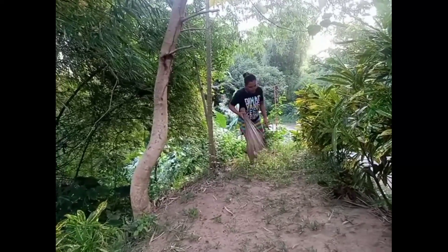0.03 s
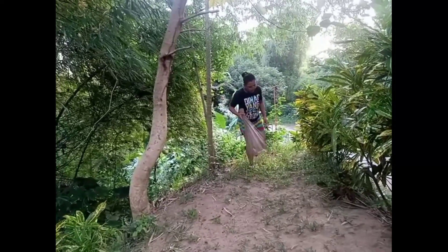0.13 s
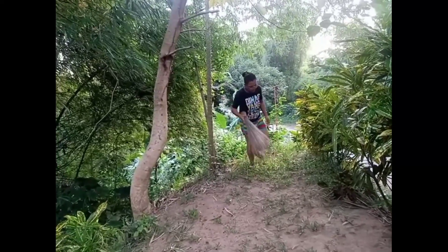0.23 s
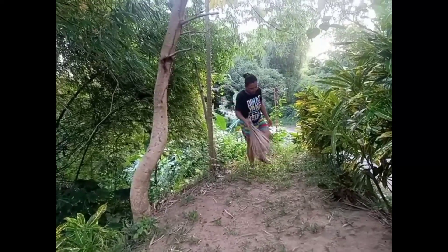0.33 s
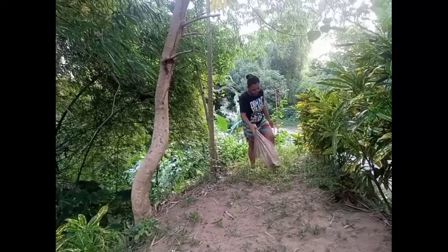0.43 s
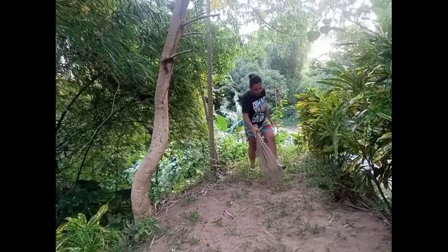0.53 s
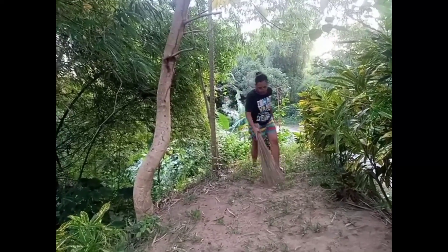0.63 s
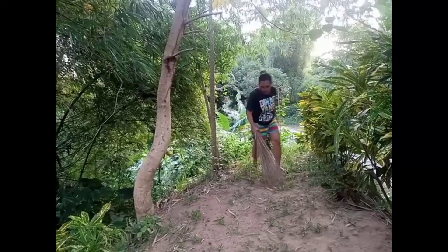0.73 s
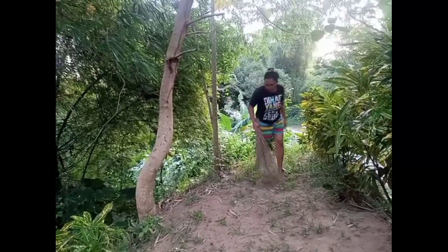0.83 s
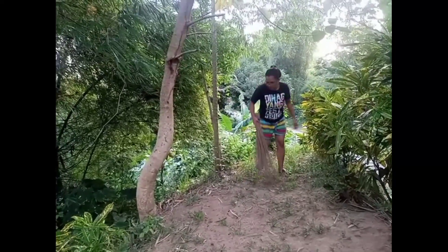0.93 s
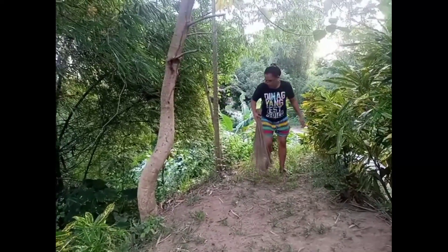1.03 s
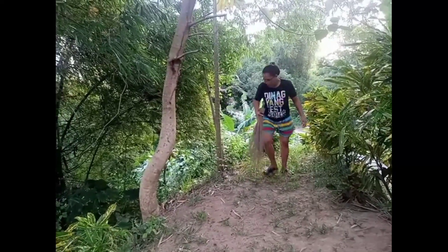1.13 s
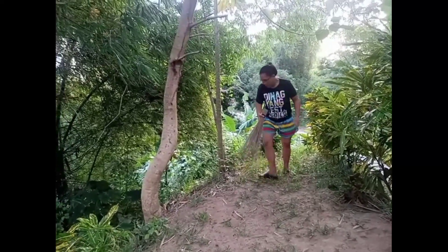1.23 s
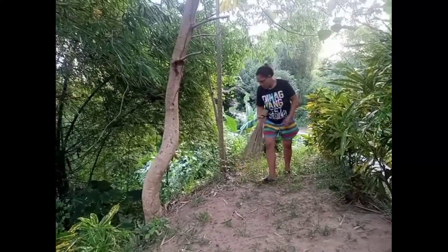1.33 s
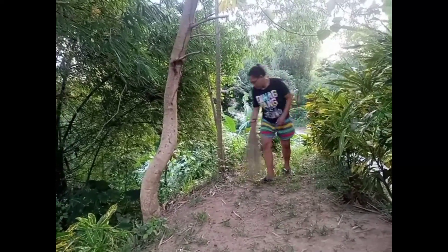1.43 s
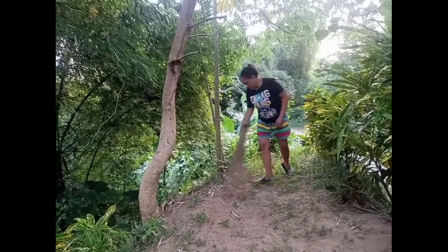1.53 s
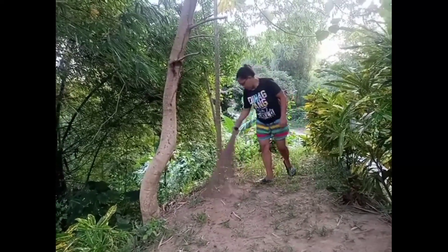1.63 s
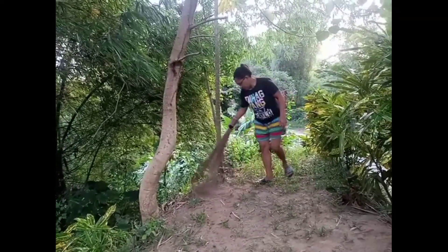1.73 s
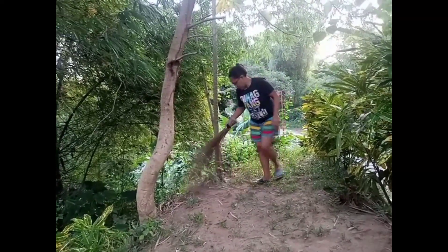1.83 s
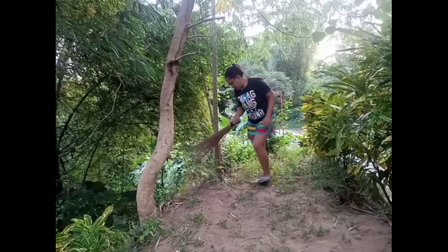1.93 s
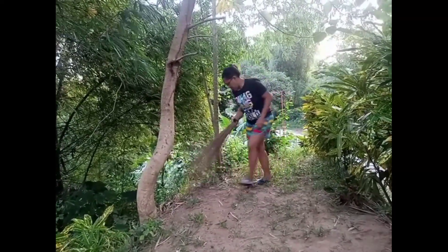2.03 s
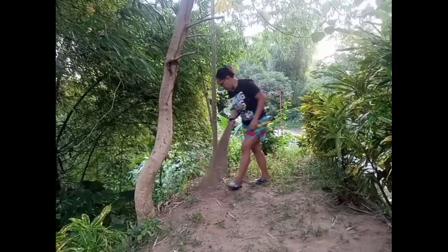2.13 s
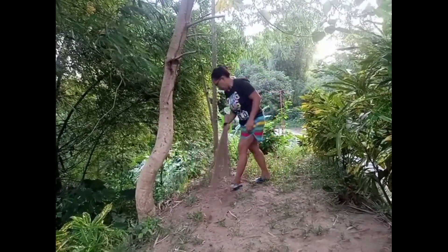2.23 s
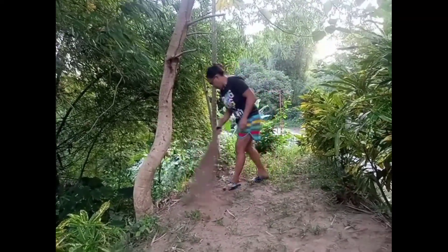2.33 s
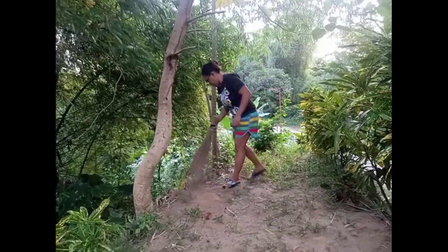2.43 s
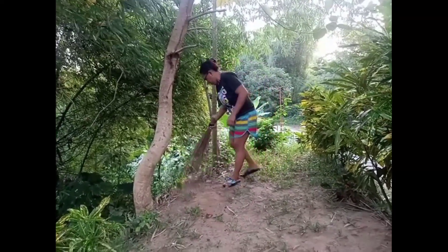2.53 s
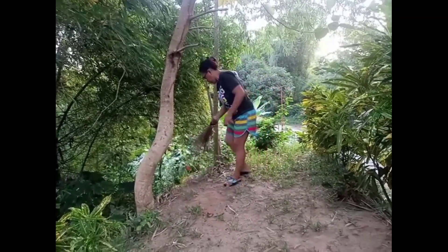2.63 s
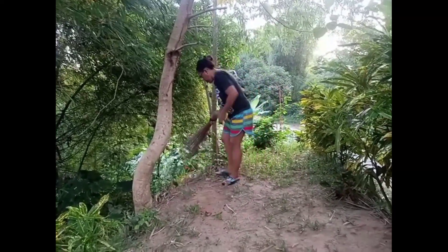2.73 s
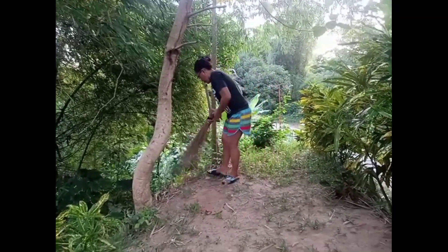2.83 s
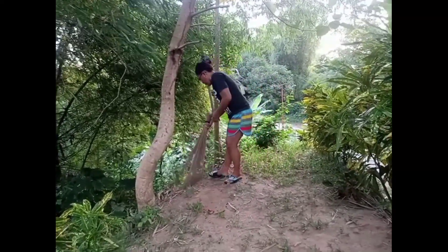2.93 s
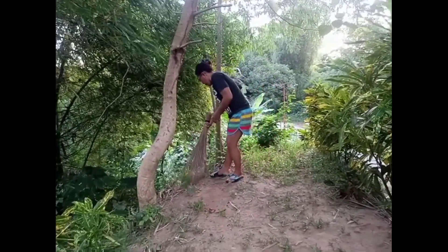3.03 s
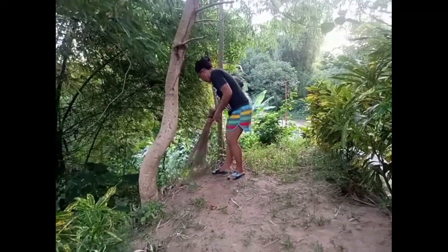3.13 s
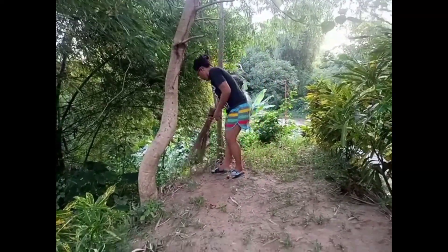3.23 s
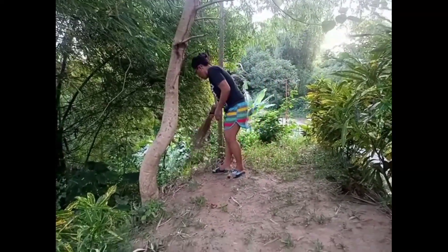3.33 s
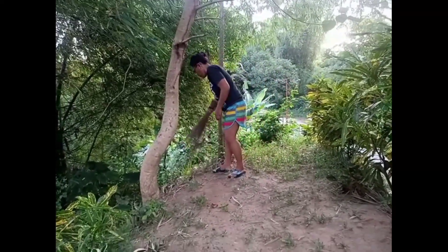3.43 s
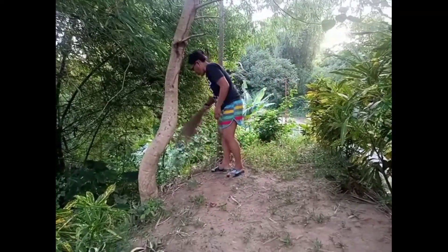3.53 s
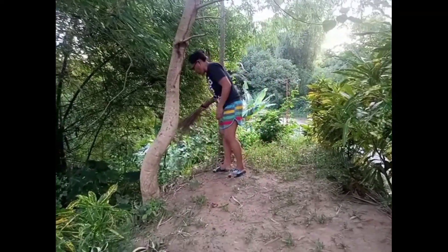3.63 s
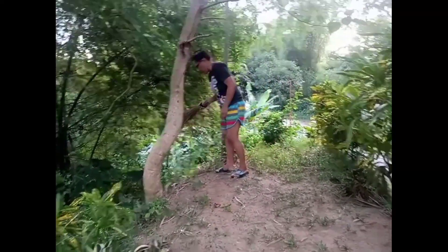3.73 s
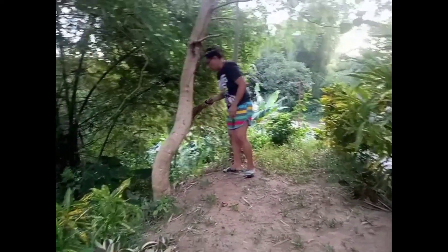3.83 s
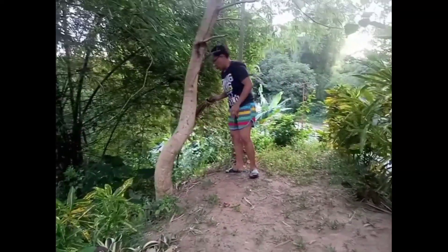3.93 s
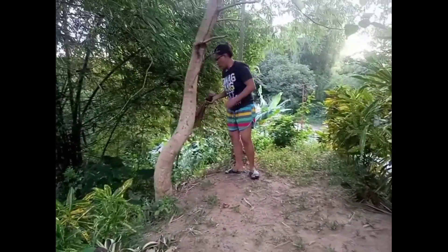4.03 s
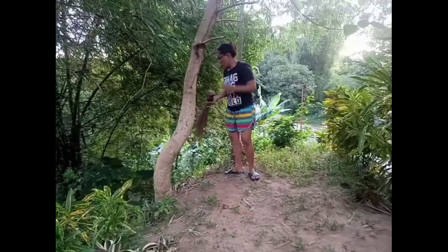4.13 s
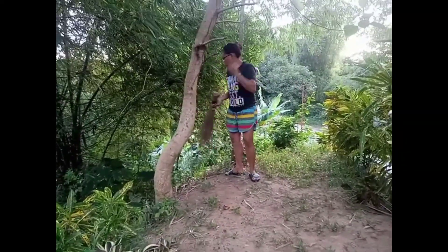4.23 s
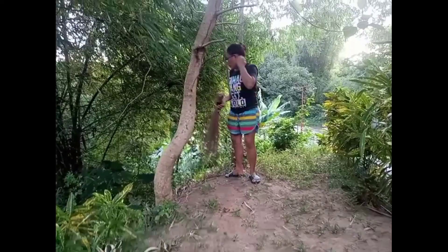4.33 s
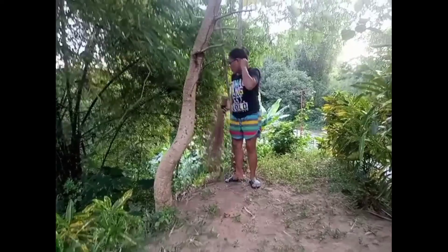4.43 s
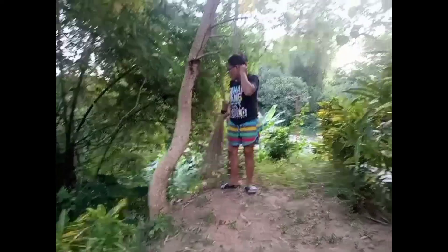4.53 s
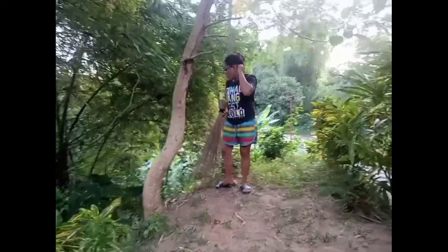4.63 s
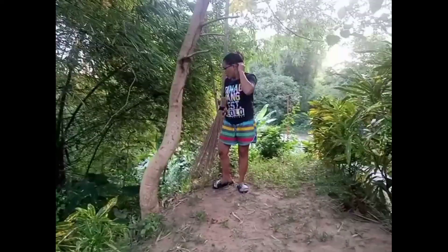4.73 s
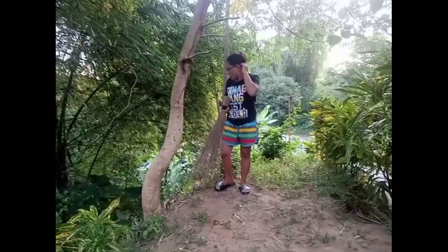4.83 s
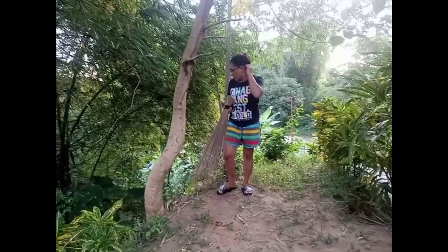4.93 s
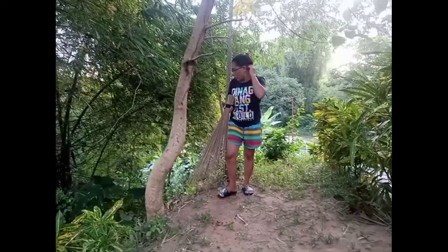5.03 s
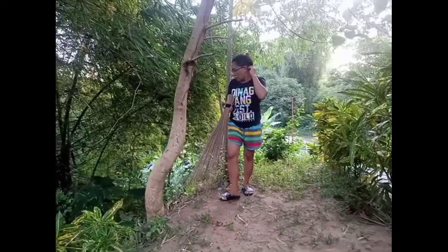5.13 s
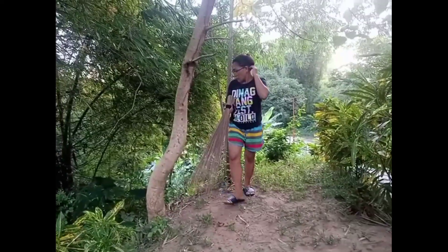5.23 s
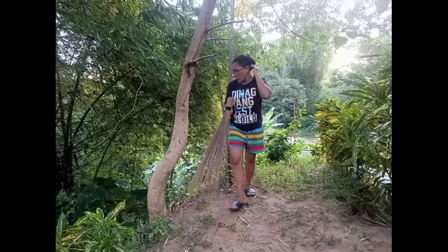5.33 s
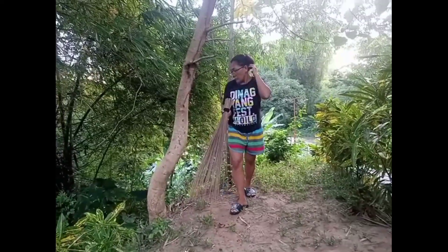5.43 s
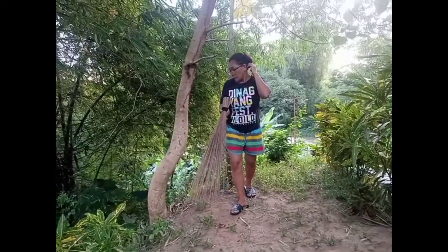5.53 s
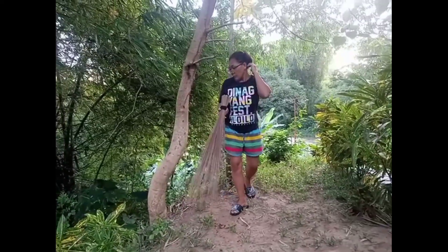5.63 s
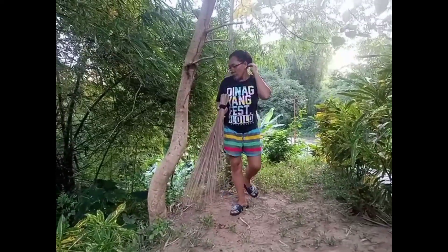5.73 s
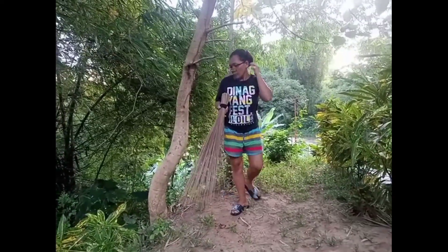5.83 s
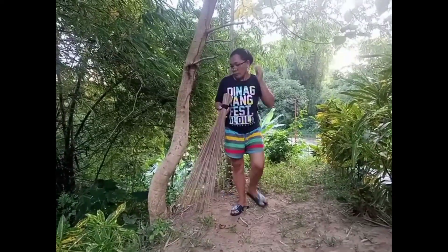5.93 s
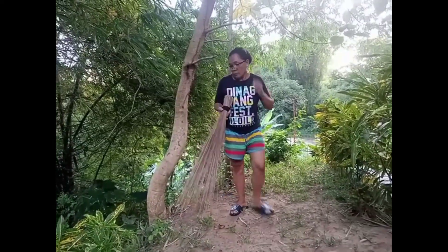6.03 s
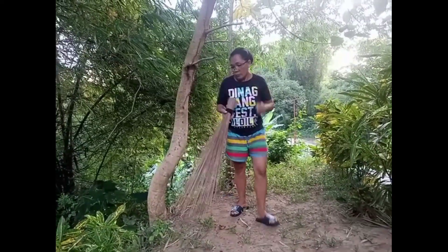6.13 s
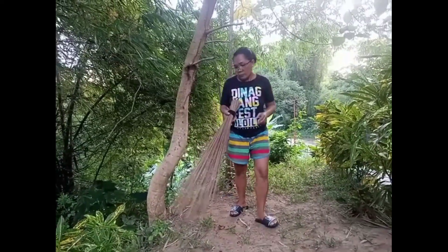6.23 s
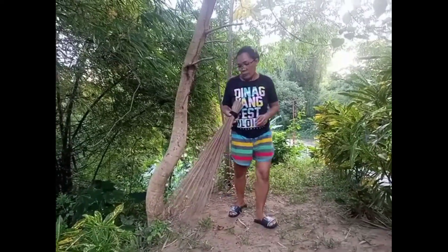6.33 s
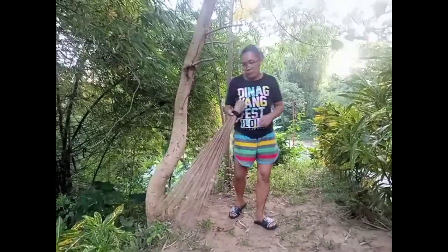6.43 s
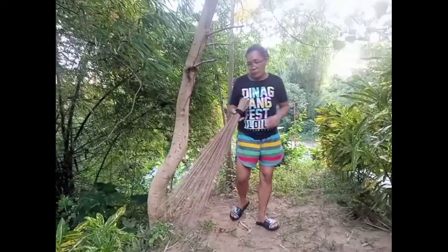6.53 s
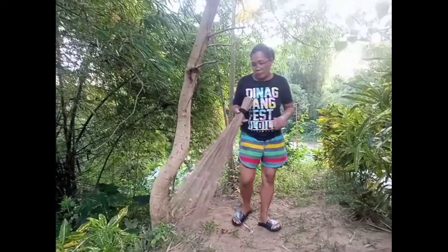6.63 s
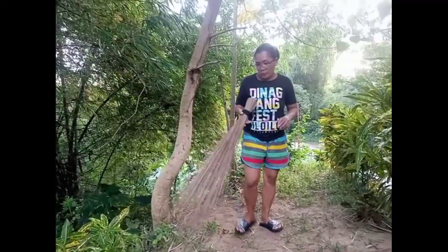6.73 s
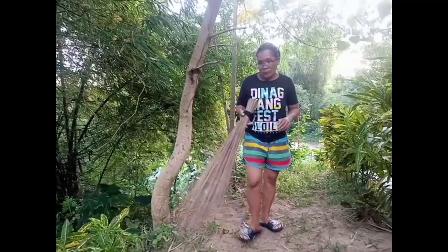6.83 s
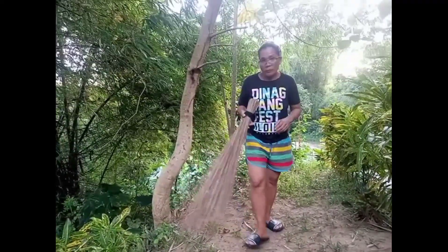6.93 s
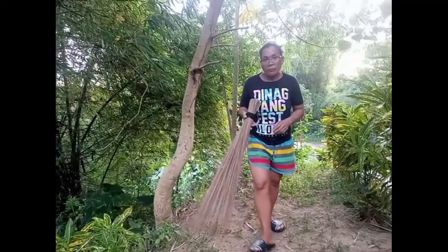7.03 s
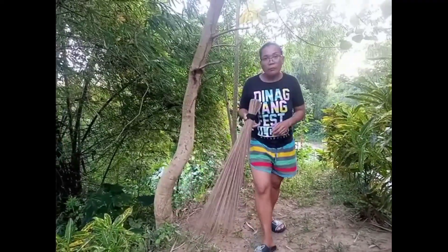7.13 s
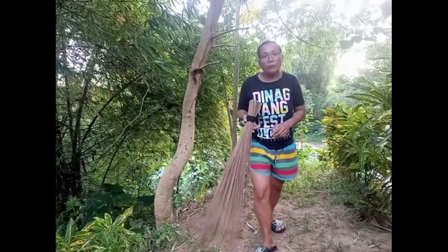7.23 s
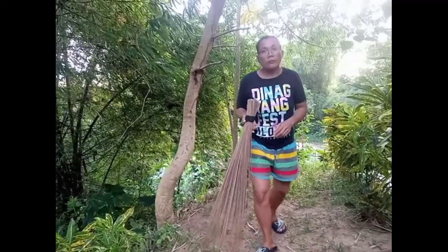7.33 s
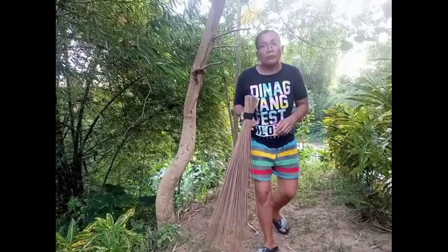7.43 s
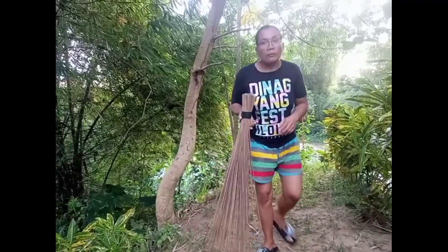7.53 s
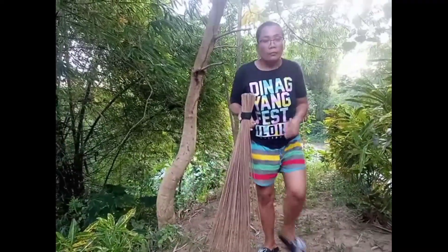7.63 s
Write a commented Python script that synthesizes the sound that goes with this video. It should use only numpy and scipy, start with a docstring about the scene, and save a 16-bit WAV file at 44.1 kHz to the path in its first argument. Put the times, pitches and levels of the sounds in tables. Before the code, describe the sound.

Close by, a stiff broom brushes a dirt garden path lightly, then gives three hard, scratchy swishes that knock pebbles and snap dry twigs. A few lighter strokes follow before the sweeping stops and sandals take several soft steps over leaf litter. Throughout, insects sizzle very high, small birds twitter faintly and a distant engine putters under a low rumble.

```python
"""A garden path, the microphone close to a broom of stiff palm ribs sweeping the dirt.
From the start a far engine putters under a low rumble, insects sizzle high up and small birds twitter.
Light brushing comes first, then three hard swishes: the tips scratch, the ribs ring, grit and pebbles
roll ahead of them and dry twigs snap. After a few lighter strokes the sweeping stops,
and sandals take a few steps over leaf litter while the engine sinks away and partly returns."""
import sys
import numpy as np
from scipy import signal
from scipy.fft import rfft, irfft, next_fast_len
from scipy.io import wavfile
from scipy.ndimage import map_coordinates

SR = 44100
rng = np.random.default_rng(int(sys.argv[2]) if len(sys.argv) > 2 else 0)


def inscribe(sig):
    """Save sig as 16-bit PCM at rate SR to the path in sys.argv[1].

    A 1-D sig is mono; a 2-D sig holds one channel per row.
    Samples are clipped to [-1, 1] before scaling.
    """
    pcm = np.round(np.clip(np.atleast_2d(sig).T, -1, 1) * 32767)
    wavfile.write(sys.argv[1], SR, pcm.astype(np.int16))


N = 338511
TIME = np.arange(N) / SR
CONTROL_TIME = TIME[::40]   # coarse clock for envelopes

# Tone colours at the microphone. Each row: frequency in Hz, relative spectral density in dB.
RUMBLE_SPECTRUM = [(30, -23), (50, -28), (80, -12.5), (125, -1), (165, 2.5), (250, -3), (330, -13.5),
                   (420, -15), (560, -25.5), (900, -34.5)]
GARDEN_SPECTRUM = [(600, -19), (1050, -10), (1750, -10.5), (2300, -1), (3500, 3), (4800, -1), (5700, 6.5),
                   (7200, -1.5), (8200, -11), (10000, -12.5), (12000, -6)]
INSECT_SPECTRUM = [(11000, -47), (12400, -29), (13200, -3.5), (13800, 1), (14250, 4), (14800, -3),
                   (15500, -5.5)]
LITTER_SPECTRUM = [(500, -15), (1100, -13.5), (1600, -3), (2300, -5), (3400, 4.5), (4500, -1), (7000, -6),
                   (11000, -8)]
GRIT_SPECTRUM = [(200, -22), (450, -30), (800, -2.5), (1200, -0.5), (1800, 6.5), (3000, -22)]
TIP_SPECTRUM = [(4500, -14.5), (6000, -9.5), (7700, -13), (9300, -6), (10300, -10.5), (11400, -14.5),
                (12400, -10.5), (13400, -0.5), (14300, 2), (15500, -4.5)]
RIB_SPECTRUM = [(1200, -33), (1900, -13), (2400, -6), (2900, -2), (3600, -0.5), (4400, 0), (5200, -2),
                (6200, -7), (7500, -7.5), (10000, -14)]
# Heard level of the rumble and engine, which dips around the hard swishes.
# Each row: time in seconds, relative level in dB.
RUMBLE_LEVEL = [(0.0, -42), (0.19, -42), (1.11, -37), (1.9, -40), (2.29, -36.5), (2.78, -43.5),
                (4.74, -37.5), (5.04, -39.5), (6.16, -35.5), (6.29, -38.5), (6.78, -36), (7.68, -35.5)]
ENGINE_LEVEL = [(0, -36.5), (.6, -38.5), (1.4, -33.5), (2.7, -43.5), (4.4, -36), (5.9, -41.5), (6.6, -60.5),
                (7.68, -45)]
# Air pushing on the microphone. Each row: peak time in seconds, relative level in dB.
BUFFETS = [(0.78, -37), (1.23, -31), (1.5, -29.5), (2.12, -25.5), (4.54, -30.5), (5.32, -30), (5.6, -35),
           (5.85, -37), (6.35, -31), (7.11, -27.5), (7.54, -26)]
# Speed of the far engine. Each row: time in seconds, firings per second.
ENGINE_SPEED = [(0, 40.2), (1.5, 42.6), (3, 39)]
# Its held tones. Each row: multiple of the firing rate, relative level in dB.
ENGINE_TONES = [(5, -4), (6, -4.5), (7, 0.5), (10, -22), (11, -13.5)]
# Birds some way off. Each row: start and length in seconds, relative level in dB, pitch in Hz,
# notes per second.
TWITTERS = [(0.291, 0.12, -39.5, 6760, 44), (0.585, 0.12, -36, 6760, 25), (1.55, .08, -36, 6880, 57),
            (4.192, 0.089, -37, 6850, 47), (4.864, 0.073, -35, 6900, 59), (5.05, 0.087, -33.5, 7010, 34),
            (5.325, 0.11, -35.5, 6840, 40), (6.485, 0.1, -32.5, 6680, 78), (6.686, 0.086, -32, 6900, 47),
            (6.914, 0.11, -32, 6830, 90)]
# Sandals on leaf litter nearby. Each row: peak time in seconds, rustle level in dB.
STEPS = [(5.18, -43), (5.5, -33.5), (5.84, -45), (6.06, -37), (6.262, -28.5), (6.98, -48), (7.14, -29.5),
         (7.22, -33), (7.62, -37.5)]
# Dull bumps, knocked pebbles and snapping twigs and ribs, all close by.
# Each row: time in seconds, relative peak in dB, pitch in Hz, bandwidth as a share of the pitch.
BUMPS = [(2.105, -27, 218, 0.5), (2.121, -10.5, 242, 0.45), (2.136, -5.5, 286, 0.37),
         (7.522, -31, 202.5, 0.44), (7.541, -33, 199, 0.4), (7.559, -22.5, 220, 0.33)]
PEBBLES = [(2.195, -24, 840, 0.76), (2.236, -6, 1670, 0.6), (2.302, -16, 740, 0.71),
           (2.594, -7.5, 1610, 0.38), (2.727, -15.5, 972, 0.67), (2.742, -22, 1780, 0.5),
           (3.073, -19, 1050, 0.18)]
SNAPS = [(1.3256, -13, 14300, 0.25), (2.2159, -9, 15500, 0.25), (2.303, 0.5, 14800, 0.11),
         (2.7456, 6, 14950, 0.2), (6.251, -17.5, 3200, 0.4), (6.2584, -19, 3200, 0.43),
         (6.266, -15, 2820, 0.21)]
# Ribs chafing during the sweeping, and one brief, bright crunch among the footsteps.
# Each row: start and length in seconds, level in dB, pitch and bandwidth in Hz.
CHAFES_AND_CRUNCH = [(1.158, 0.053, -28, 8850, 1110), (3.213, 0.18, -25, 2960, 90),
                     (3.882, 0.061, -32, 5250, 200), (4.44, 0.39, -37, 3350, 110),
                     (7.197, .03, -33, 9000, 6000)]
# Bending resonances of the ribs. Each row: frequency and bandwidth in Hz, relative level in dB.
RIB_MODES = [(1800, 160, -11), (2906, 300, -0.5), (4400, 290, -2.5), (5950, 360, -2.5)]
# Broom strokes, hard pushes and light drags. Each row: start and push length in seconds,
# fade of the ribs in dB per second, then relative levels in dB of rib ring, tip scratch and grit.
STROKES = [(0.56, 0.1, 100, -40, -52, -47), (0.685, 0.067, 132, -26.5, -29.5, -49),
           (0.80, 0.23, 15, -33, -36.5, -53.5), (1.61, 0.21, 57, -14.5, -17.5, -43),
           (2.0, 0.11, 42, -28, -35, -39), (2.14, 0.089, 71, -26, -28, -33.5),
           (2.403, 0.26, 85, -16, -19, -41), (2.70, 0.028, 152, -26, -19.5, -41),
           (2.82, 0.052, 30, -31.5, -39, -43), (2.962, 0.11, 62, -24.5, -27.5, -45),
           (3.147, 0.17, 50, -17.5, -21.5, -48), (3.6, 0.1, 25, -33, -36.5, -67),
           (3.85, 0.04, 67, -32.5, -31, -60), (4.41, 0.41, 42, -32, -38, -71),
           (4.77, 0.025, 150, -32, -35, -64)]


def from_db(db):
    """Decibels to gain."""
    return 10 ** (np.asarray(db) / 20)


def unit_rms(x):
    """Scale to unit power."""
    return x / np.sqrt(np.mean(x ** 2) + 1e-20)


def curve(rows):
    """A curve of (seconds, value) points at every sample."""
    return np.interp(TIME, *np.transpose(rows))


def drift(hz):
    """A smooth random wander, mostly slower than hz; rms 1."""
    pole = np.exp(-2 * np.pi * hz * 40 / SR)
    noise = rng.standard_normal(N // 40 + 2002)
    slow = signal.lfilter([1], [1, -2 * pole, pole * pole], noise)[2000:]
    return np.interp(np.arange(N) / 40, np.arange(len(slow)), unit_rms(slow))


def coloured(x, spectrum):
    """Give a signal a spectrum that falls away beyond its ends; rms 1."""
    size = next_fast_len(N)
    log_hz = np.log(np.arange(size // 2 + 1) * SR / size + 1)
    hz, db = np.transpose(spectrum)
    beyond = np.abs(log_hz - np.clip(log_hz, np.log(hz[0]), np.log(hz[-1])))
    gain = from_db(np.interp(log_hz, np.log(hz), db) - 60 * beyond)
    return unit_rms(irfft(rfft(x, size) * gain, size)[:N])


def patchy(x, depth_db, patch_hz, patch_s):
    """Narrow parts of the spectrum swell and fade independently; rms 1."""
    hz, s, frames = signal.stft(x, SR, nperseg=1024)
    grid = np.meshgrid(hz / patch_hz, s / patch_s, indexing="ij")
    patches = map_coordinates(rng.standard_normal((256, 256)), grid, mode="mirror")
    return unit_rms(signal.istft(frames * from_db(depth_db * patches), SR)[1][:N])


def resonate(x, hz, width_hz):
    """A resonance with gain 1 at its peak."""
    radius, angle = np.exp(-np.pi * width_hz / SR), 2 * np.pi * hz / SR
    feedback = [1, -2 * radius * np.cos(angle), radius ** 2]
    return signal.lfilter(np.array([1, 0, -1]) * (1 - radius ** 2) / 2, feedback, x + 1e-18)


def clicks(per_s, spread_db=0):
    """Random tiny clicks; a spread makes a few stand out; rms 1."""
    sizes = from_db(spread_db * np.minimum(rng.exponential(1, N), 4))
    signs = rng.choice([-1, 1], N)
    return unit_rms(sizes * signs * (rng.random(N) < per_s / SR))


def add(out, start_s, sound):
    """Mix a short sound in at a time."""
    at = round(start_s * SR)
    out[at:at + len(sound)] += sound[:N - at]


def power_sum(envelopes):
    """Overlapping envelopes add in power; a gain for every sample."""
    return np.interp(TIME, CONTROL_TIME, np.sqrt(np.sum(np.square(envelopes), axis=0)))


def surges(rows, rise_s, fall_s):
    """Each event grows to its peak and dies away exponentially."""
    envelopes = []
    for peak_s, db in rows:
        t = CONTROL_TIME - peak_s
        envelopes.append(from_db(db) * np.exp(-np.maximum(-t / rise_s, t / fall_s)))
    return power_sum(envelopes)


def foliage(x, t60_s):
    """Leaves and trunks scatter a diffuse tail back to the microphone."""
    t = TIME[:SR // 2]
    tail = rng.standard_normal(len(t)) * from_db(-60 * t / t60_s) * (t > .004)
    return signal.fftconvolve(x, tail / np.linalg.norm(tail))[:N]


def rumble():
    """A low, restless rumble in the distance."""
    noise = coloured(rng.standard_normal(N), RUMBLE_SPECTRUM)
    return from_db(curve(RUMBLE_LEVEL) + 1.07) * patchy(noise, depth_db=3.5, patch_hz=90, patch_s=.09)


def air_buffets():
    """Air pushes softly on the microphone in low puffs."""
    noise = coloured(rng.standard_normal(N), [(30, -38), (70, -13), (130, 1), (190, -5), (300, -12)])
    return from_db(-2) * surges(BUFFETS, rise_s=0.067, fall_s=0.05) * noise


def garden_hiss():
    """A fine, shimmering hiss all around the garden, slowly growing."""
    level_db = -39.5 + 0.685 * TIME + 1.1 * drift(11.5)
    hiss = coloured(clicks(per_s=14000, spread_db=3.5), GARDEN_SPECTRUM)
    return from_db(level_db) * patchy(hiss, depth_db=3, patch_hz=130.7, patch_s=.09)


def insects():
    """Dense clicks merge into a very high sizzle, slowly growing."""
    level_db = -36.5 + 0.92 * TIME + 1.1 * drift(60)
    return from_db(level_db) * coloured(clicks(per_s=7000), INSECT_SPECTRUM)


def engine():
    """Uneven exhaust pulses, dulled by distance, arrive directly and off the trees, over a drone."""
    firing_hz = curve(ENGINE_SPEED) * (1 + 0.0078 * drift(2.03))
    cycles = np.cumsum(firing_hz) / SR
    uneven = np.maximum.accumulate(cycles + 0.062 * drift(7.9))   # firings come a little early or late
    pulses = np.diff(np.floor(uneven), prepend=0) * from_db(2 * drift(29))
    exhaust = resonate(resonate(pulses, hz=228, width_hz=88), hz=257, width_hz=186)
    exhaust = signal.sosfilt(signal.butter(6, 450, fs=SR, output="sos"), exhaust)
    echoes = sum(.3 * drift(1.5) * np.interp(TIME - lag_s, TIME, exhaust, left=0)
                 for lag_s in rng.uniform(.03, .2, 4))
    drone = sum(from_db(db + 2.9 * drift(2.7)) * np.sin(2 * np.pi * k * cycles + 0.3 * drift(3.8))
                for k, db in ENGINE_TONES)
    return from_db(curve(ENGINE_LEVEL)) * (unit_rms(exhaust + echoes) + from_db(-3) * unit_rms(drone))


def birds():
    """Quick runs of falling notes, far enough off that the scatter outweighs the direct sound."""
    calls = np.zeros(N)
    for start, length, level_db, hz, notes_per_s in TWITTERS:
        t = TIME[:int(length * SR)]
        note_phase = t * notes_per_s % 1
        waver = np.interp(t, np.linspace(0, length, 60), rng.standard_normal(60))
        pitch = hz * (1 + 0.278 * (.5 - note_phase) + 0.0265 * waver)
        swell = np.sin(np.pi * note_phase) ** 2 * signal.windows.tukey(len(t), .3)
        add(calls, start, from_db(level_db) * swell * np.sin(2 * np.pi * np.cumsum(pitch) / SR))
    return from_db(3.5) * calls + from_db(6) * foliage(calls, t60_s=0.36)


def footsteps():
    """Leaf litter crackles as a sole rolls on, then settles."""
    tread = surges(STEPS, rise_s=0.013, fall_s=0.026) * from_db(1.8 * drift(29.8))
    crackle = coloured(clicks(per_s=2500, spread_db=5), LITTER_SPECTRUM)
    return tread * patchy(crackle, depth_db=8, patch_hz=200, patch_s=.06)


def impacts(rows, contact_s, crumble):
    """A sharp contact and a brief crumbling excite one broad resonance per blow."""
    out, t = np.zeros(N), TIME[:SR // 10]
    for start, peak_db, hz, width_share in rows:
        force = (t == 0) + crumble * rng.standard_normal(len(t)) * np.exp(-t / contact_s)
        blow = resonate(force, hz, width_share * hz)
        add(out, start, from_db(peak_db) * blow / np.abs(blow).max())
    return out


def bumps():
    """Soft, heavy contacts with no treble."""
    thuds = impacts(BUMPS, contact_s=0.0081, crumble=0.015)
    return from_db(3.5) * signal.sosfilt(signal.butter(3, 330, fs=SR, output="sos"), thuds)


def pebbles():
    """Pebbles clack as the broom knocks them aside."""
    return from_db(-1.5) * impacts(PEBBLES, contact_s=0.0022, crumble=0.096)


def snaps():
    """Dry twigs and ribs break with a bright crack."""
    return from_db(4) * impacts(SNAPS, contact_s=.002, crumble=.14)


def sweeping(levels_db, swell_db, fade_factor=1):
    """In each stroke the broom bites, presses harder through the push, then fades as it lifts."""
    envelopes = []
    for (start, push_s, fade_db_per_s, *_), level_db in zip(STROKES, levels_db):
        t = np.maximum(CONTROL_TIME - start, 0)
        bite = np.sin(np.pi / 2 * np.minimum(t / 0.074, 1))   # the tips meet the ground
        push_db = swell_db * np.minimum(t / push_s - 1, 0)
        lift_db = fade_factor * fade_db_per_s * np.maximum(t - push_s, 0)
        envelopes.append(bite * from_db(level_db + push_db - lift_db))
    return power_sum(envelopes)


def grit():
    """Crumbs of earth tumble ahead of the broom."""
    *_, grit_db = np.transpose(STROKES)
    tumbling = sweeping(grit_db, swell_db=1, fade_factor=1.2) * from_db(-3.5 + 3.5 * drift(39.7))
    return tumbling * coloured(clicks(per_s=1800, spread_db=1.5), GRIT_SPECTRUM)


def chafes_and_crunch():
    """Clicks ring a resonance: narrow for the rough note of a chafing rib, wide for the brief crunch."""
    out = np.zeros(N)
    for start, length, level_db, hz, width_hz in CHAFES_AND_CRUNCH:
        swell = signal.windows.tukey(int(length * SR), .6)
        rasp = unit_rms(resonate(clicks(per_s=4000, spread_db=2.5), hz, width_hz))
        add(out, start, from_db(level_db) * swell * rasp[-len(swell):])
    return out


def broom():
    """Close up, rib tips catch and slip on the soil; the slips hiss and set the ribs ringing."""
    *_, ribs_db, tips_db, _ = np.transpose(STROKES)
    judder = from_db(drift(38))   # the ribs catch in bunches
    tips = coloured(clicks(per_s=12000, spread_db=4), TIP_SPECTRUM)
    tips = patchy(tips, depth_db=2, patch_hz=300.7, patch_s=.07)
    shafts = coloured(clicks(per_s=8000), RIB_SPECTRUM)
    modes = sum(from_db(db) * resonate(clicks(per_s=4000), hz, width) for hz, width, db in RIB_MODES)
    # the load shifts from rib to rib, so the resonances come and go
    ribs = patchy(shafts + from_db(-6.5) * unit_rms(modes), depth_db=2.5, patch_hz=170.3, patch_s=.09)
    scratch = sweeping(tips_db + 7.5, swell_db=3.5, fade_factor=1.02) * tips
    ring = sweeping(ribs_db, swell_db=6) * ribs
    return judder * (scratch + ring)


def scene():
    """One microphone by the path: sweeping and steps close by, the garden around, the engine far off."""
    around = garden_hiss() + insects()
    near = footsteps() + pebbles() + snaps() + broom() + chafes_and_crunch() + grit() + bumps()
    far = birds() + engine()
    scatter = from_db(-11) * foliage(near, t60_s=0.13)
    return (near + scatter + around + far + rumble() + air_buffets())[None]


def record(dry):
    """The recorder rounds off the highest peaks and cuts the top steeply."""
    ceiling, cutoff_hz = .75, 15600
    rounded = dry / (1 + (dry / ceiling) ** 8) ** (1 / 8)
    lowpass = signal.firwin(401, cutoff_hz, fs=SR, window="blackman")
    return signal.fftconvolve(rounded, lowpass[None], "same")


dry = scene()
out = record(dry)
inscribe(out)
```